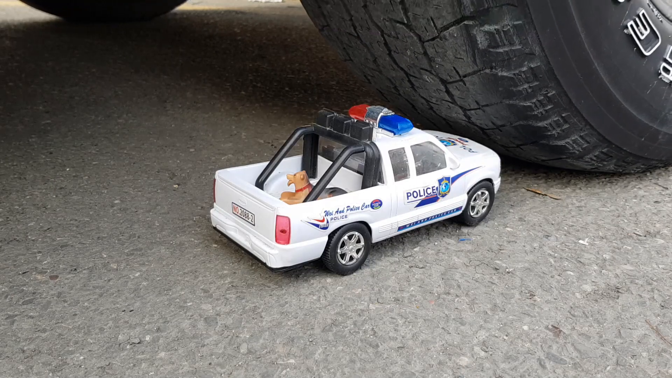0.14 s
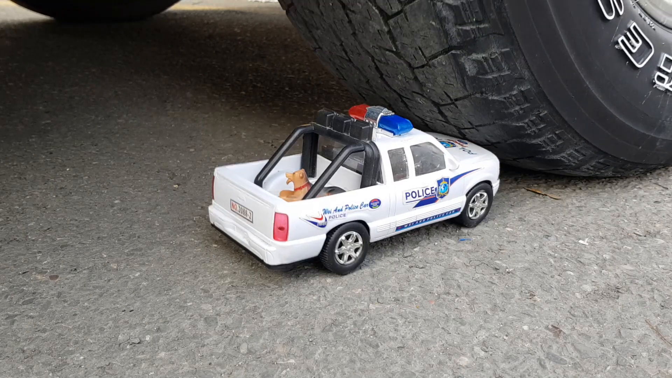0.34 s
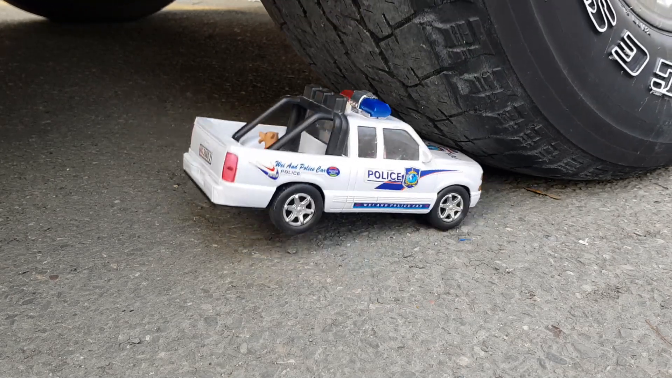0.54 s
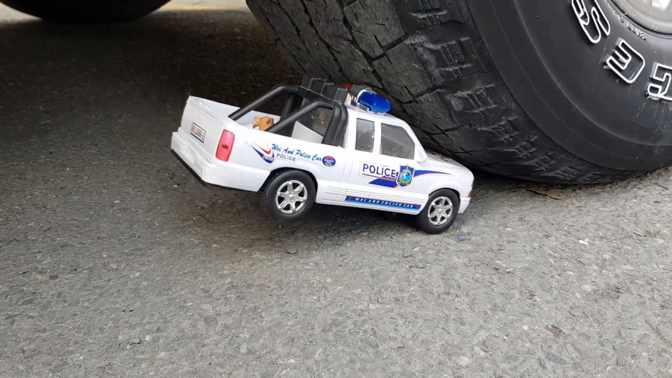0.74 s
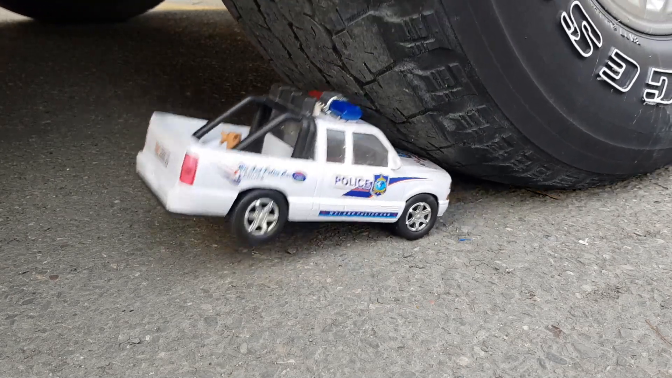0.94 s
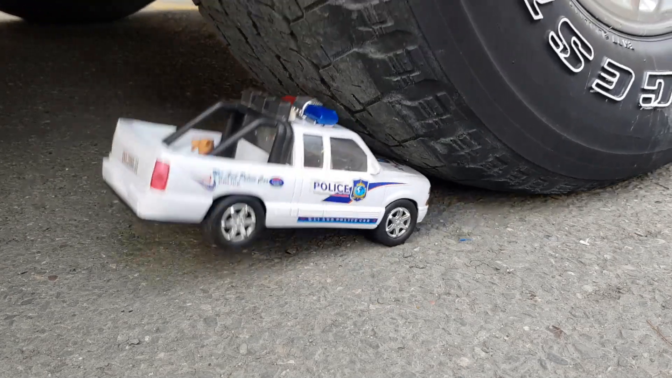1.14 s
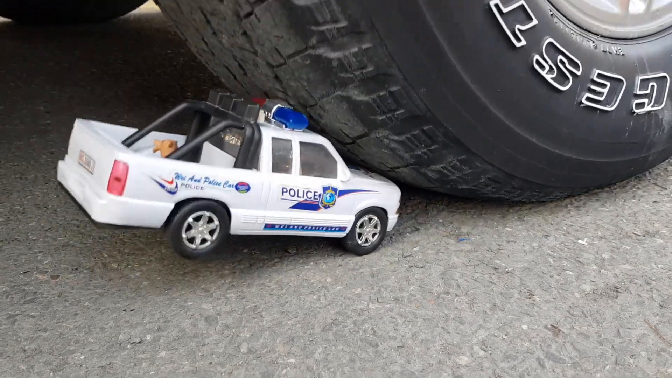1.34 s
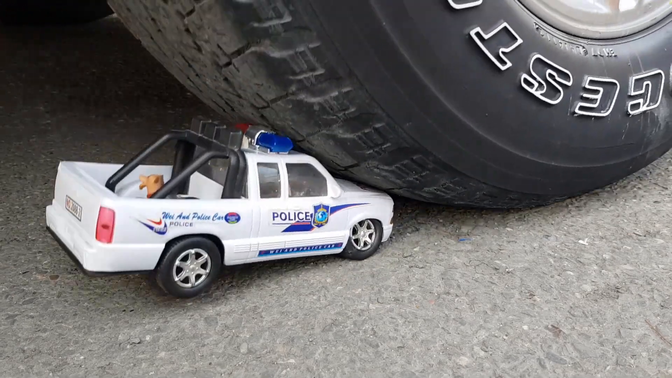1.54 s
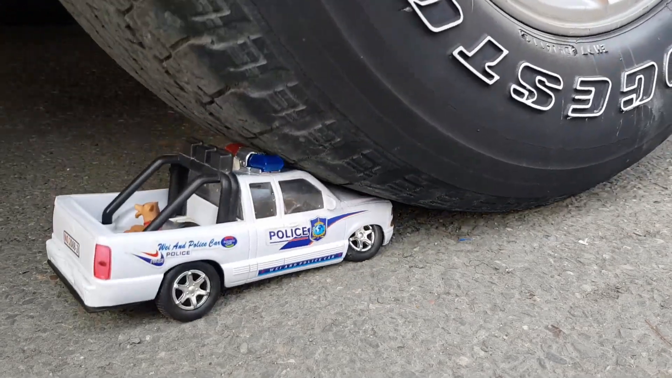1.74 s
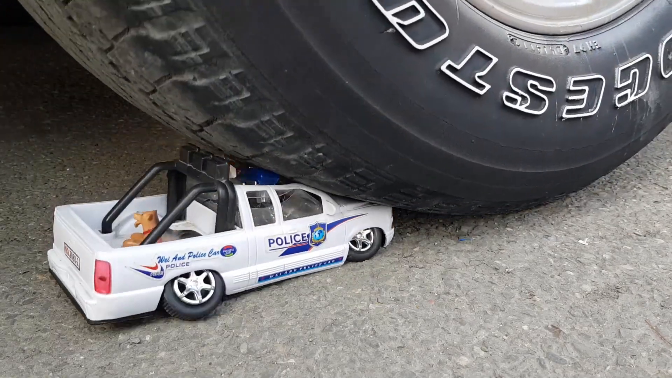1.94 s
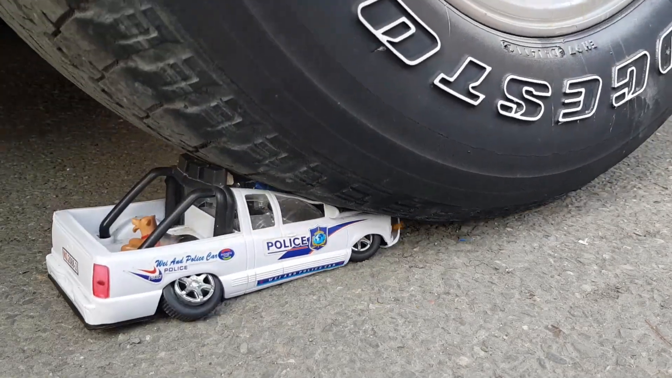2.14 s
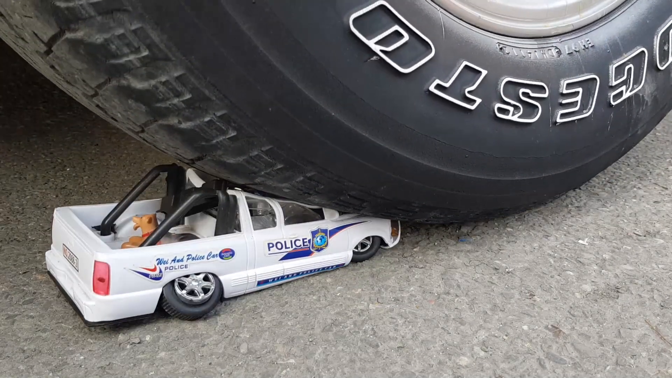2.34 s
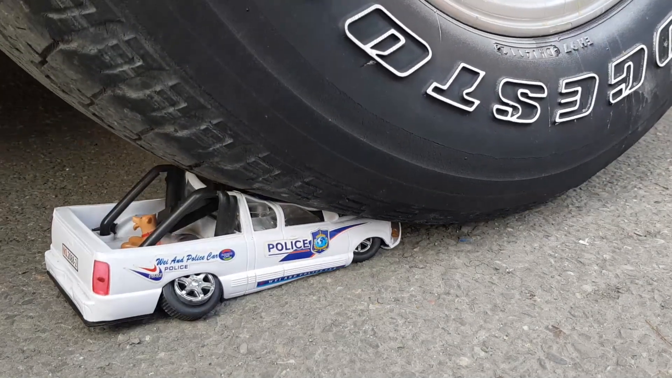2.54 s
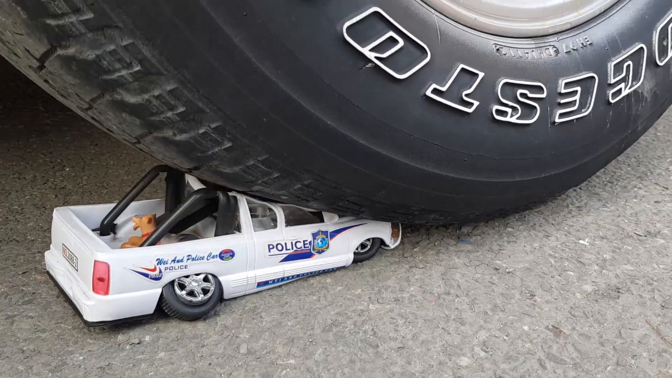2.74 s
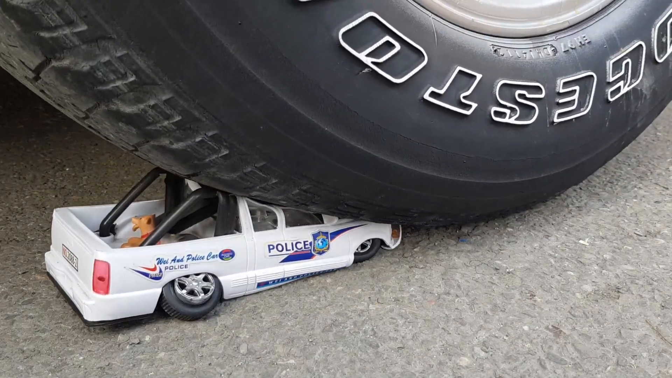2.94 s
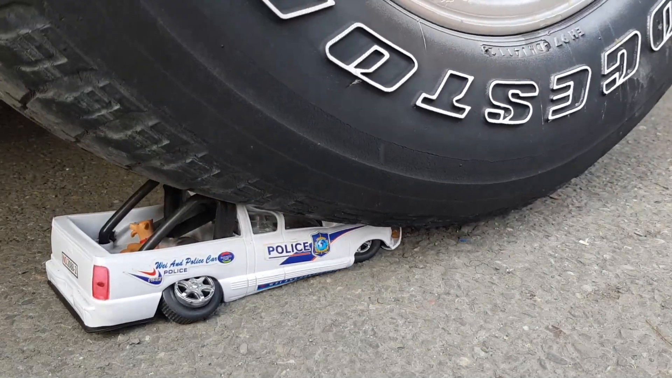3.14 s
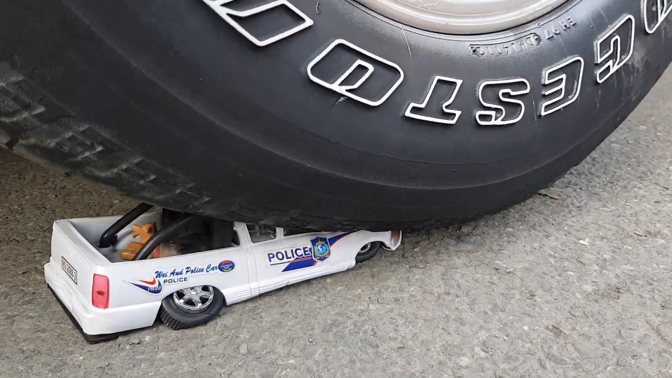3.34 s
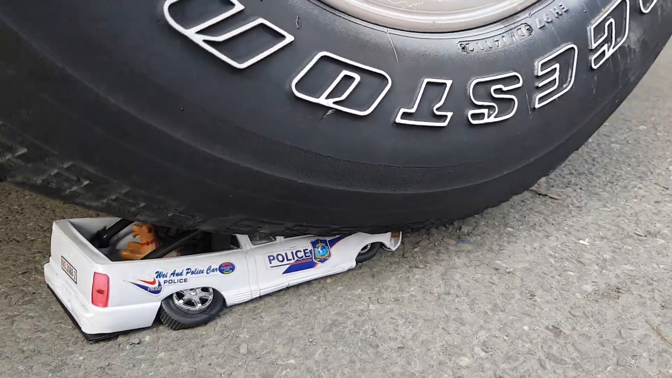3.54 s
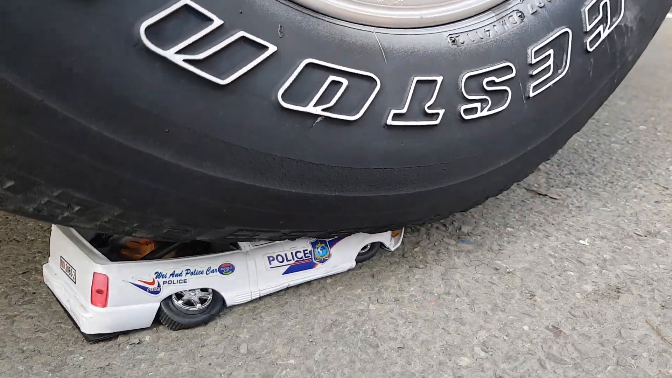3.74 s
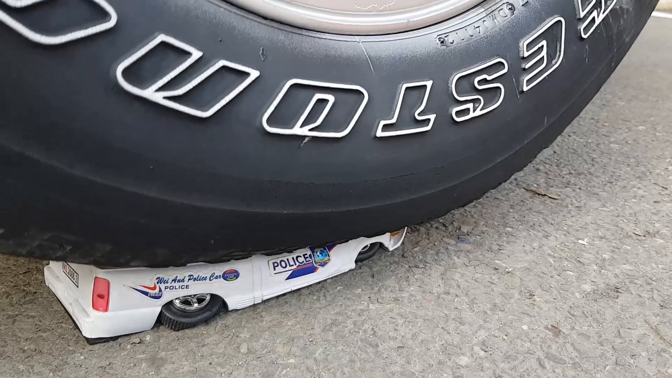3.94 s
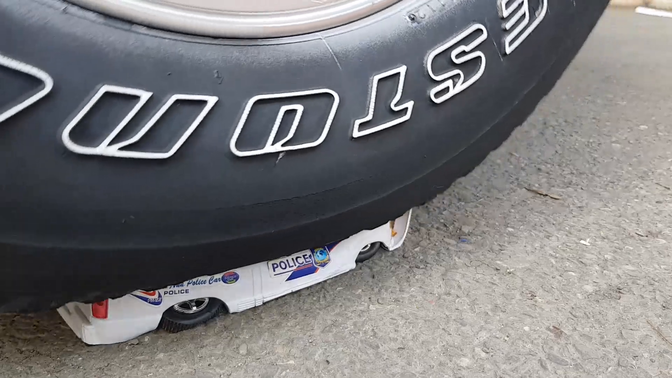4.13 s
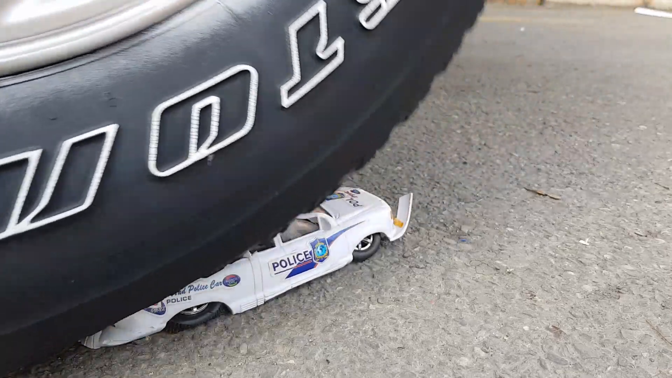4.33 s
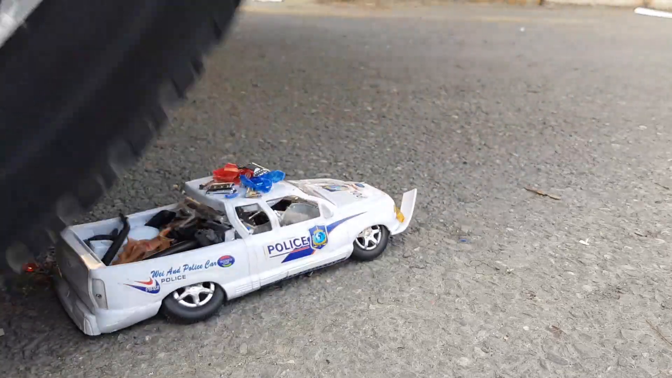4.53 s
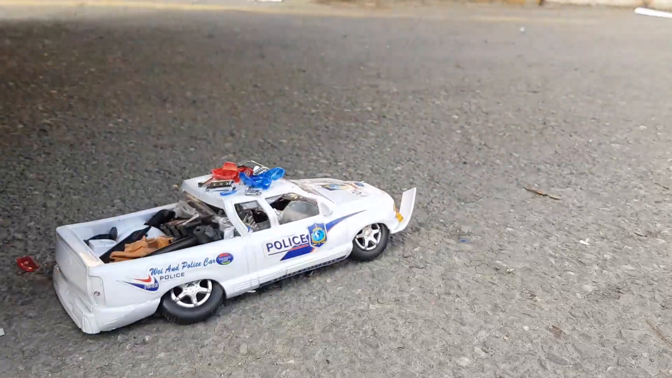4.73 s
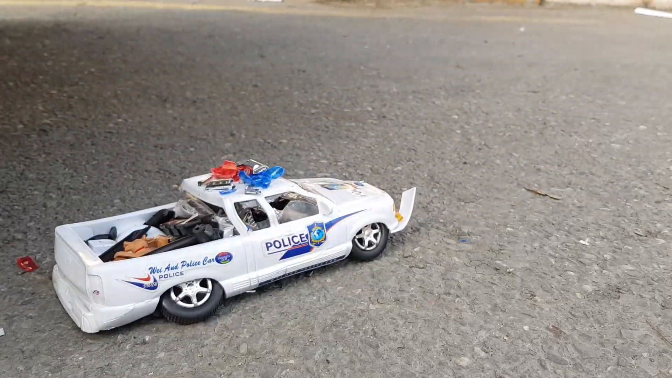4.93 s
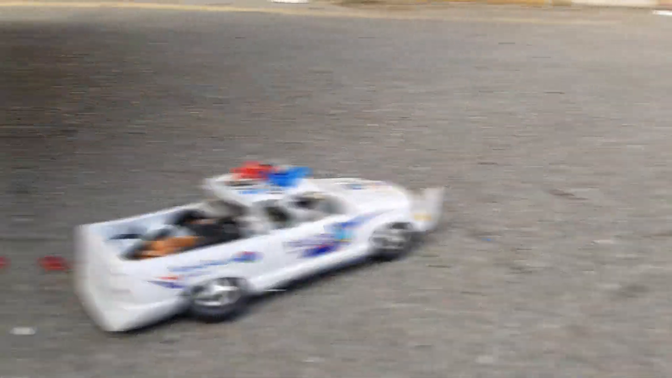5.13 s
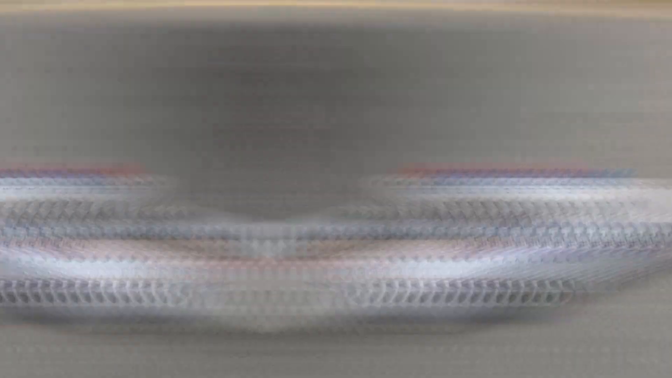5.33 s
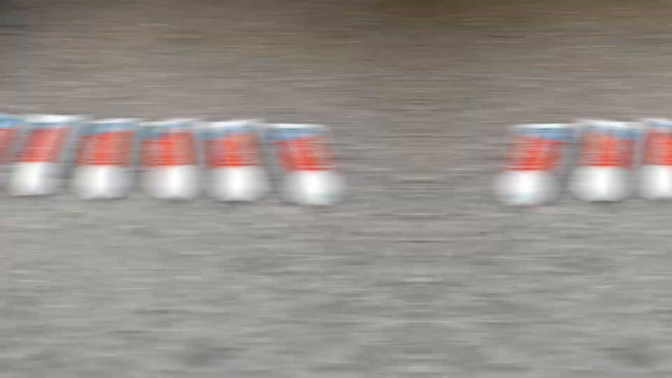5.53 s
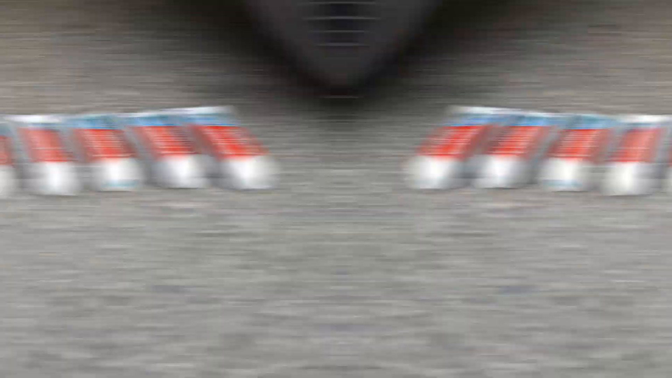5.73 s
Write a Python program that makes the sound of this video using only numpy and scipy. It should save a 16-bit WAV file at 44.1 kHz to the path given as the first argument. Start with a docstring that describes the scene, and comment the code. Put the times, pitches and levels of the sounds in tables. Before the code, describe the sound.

A car engine rumbles low and close on the left, heard from ground level on asphalt. From about 0.4 seconds its tyre shoves a hollow plastic toy truck, which skids and judders over grit in short scrapes. At 1.4 seconds the shell starts cracking in sharp, hollow snaps, densest around 2 seconds, with a brief crunch and dull thumps as it gives way. The engine sinks to a quieter rumble underneath. After a lull with a few stray clicks, brighter volleys of cracks and splintering run from about 3 to 4.4 seconds, with more low thuds near 4 seconds and a little grinding. From 4.7 to 5.2 seconds a small loose part bounces away with faint, very high tinkles. After 5 seconds the engine sound moves to the centre, and its drone, hiss and belt whirr swell until the end, near 5.8 seconds.

```python
"""On asphalt, microphone close by at ground level: a car creeps up on the left, engine rumbling throughout.
Its tread shoves a hollow plastic toy truck, which skids and judders on grit. From 1.4 s the shell
cracks in volleys that ring its body and panels, and it collapses with dull thumps under the tyre.
Near 4.7 s a small loose part tinkles away. Last, the microphone swings to face the engine bay,
and its hiss and whirr swell."""
import sys
import numpy as np
from scipy import signal
from scipy.io import wavfile

SR = 44100
rng = np.random.default_rng(int(sys.argv[2]) if len(sys.argv) > 2 else 0)


def dump(signal):
    """Clip the signal to [-1, 1] and save it as 16-bit WAV at the path in sys.argv[1]."""
    limited = np.clip(np.atleast_2d(signal).T, -1, 1)
    pcm = np.round(limited * 32767).astype(np.int16)
    wavfile.write(sys.argv[1], SR, pcm)


N = 254752
TIME = np.arange(N) / SR

# The shell cracking, close on the left. Each row: start in seconds, level in dB,
# brightness (treble over shell) in dB, tearing time in seconds.
CRACKS = [(1.4284, -10, -9, 0.001), (1.4358, -19.5, -17, 0.003), (1.4553, -14.5, 2.5, 0.0018),
          (1.4657, -14.5, -2.5, 0.00053), (1.5274, -12, -5, 0.0042), (1.5729, -14.0, -9, 0.0013),
          (1.6499, -13, -9, 0.0017), (1.6941, -13.5, -1, 0.0023), (1.7101, -11, -21.5, 0.0019),
          (1.719, -16, -29, 0.0063), (1.7412, -17, -5.5, 0.0012), (1.7872, -12.0, -0.5, 0.0023),
          (1.864, -24.5, 8, 0.001), (1.8721, -15, 0, 0.0024), (1.9144, -18, 8.5, 0.0011),
          (1.9212, -12.5, 5.5, 0.004), (1.9633, -15.5, 1, 0.0033), (1.972, -26, 4.5, 0.0042),
          (1.9974, -17, -1, 0.0014), (2.008, -22, 7.5, 0.0016), (2.0228, -19, 4.5, 0.0011),
          (2.0283, -12, 3.5, 0.0029), (2.0388, -21.5, 0, 0.0023), (2.05, -17, 10, 0.0014),
          (2.0751, -25, 7.5, 0.0011), (2.086, -14, -1, 0.0024), (2.0939, -12.5, 2, 0.0025),
          (2.1088, -15.5, 7.5, 0.0037), (2.1783, -13.5, -0.5, 0.0033), (2.2127, -19.5, 15, 0.001),
          (2.234, -14.5, 4.5, 0.0045), (2.2626, -20.5, -3, 0.0011), (2.309, -30.5, -5, 0.002),
          (2.3503, -29, 4, 0.00081), (2.3868, -28, 26, 0.00047), (2.4673, -17.5, 0, 0.00083),
          (2.7562, -24, 26, 0.0011), (2.9573, -15, 10.5, 0.0013), (3.016, -27, 18, 0.001),
          (3.0221, -26, 2.5, 0.001), (3.103, -32, 14.5, 0.0019), (3.1212, -23, 12, 0.0018),
          (3.1402, -15.5, 10, 0.0021), (3.1656, -25.5, 1, 0.0021), (3.2202, -36, 18.5, 0.001),
          (3.2392, -27.5, 9.5, 0.0015), (3.2539, -15, 3, 0.0031), (3.2608, -11, 10, 0.0023),
          (3.2856, -23, 14.5, 0.00096), (3.3021, -15, 14.5, 0.0013), (3.3574, -15.5, 12.5, 0.0012),
          (3.372, -14.5, 11, 0.00098), (3.377, -14.5, -7.5, 0.0017), (3.3846, -15.0, 0, 0.0025),
          (3.4254, -19, -1, 0.001), (3.4588, -25.5, 8, 0.0022), (3.5074, -22.5, 18, 0.0016),
          (3.5266, -16.5, 17.5, 0.0015), (3.554, -21.5, 10.5, 0.00091), (3.6022, -18.5, 20, 0.0031),
          (3.618, -23, 24, 0.0015), (3.6416, -20, 34, 0.00029), (3.648, -15, 2.5, 0.0017),
          (3.752, -39, 6, 0.0011), (3.7966, -16, 2, 0.0013), (3.8089, -23, 14, 0.00047),
          (3.8496, -38, 27, 0.00059), (3.8886, -21, 13, 0.0024), (3.896, -16.5, 8, 0.0016),
          (3.9044, -12.0, -1, 0.0024), (3.9177, -18, -3, 0.0053), (4.0365, -29.5, 3.5, 0.0012),
          (4.067, -23.5, 10.5, 0.0002), (4.1267, -16, -2.5, 0.0013), (4.1588, -20.5, 5, 0.00082),
          (4.175, -15.5, 2, 0.0047), (4.2009, -14, -4.5, 0.0016), (4.221, -15.5, 5.5, 0.0013),
          (4.2366, -15, -6, 0.0014), (4.2914, -17, 17, 0.00071), (4.3233, -18.5, 9.5, 0.00047),
          (4.3334, -14, -7.5, 0.0018), (4.3576, -24, 2, 0.00028), (4.412, -30.5, 9, 0.0018),
          (4.4477, -30.5, 19, 0.0025), (4.581, -42.5, 10, 0.001), (4.793, -39.5, 17, 0.002)]
# What the toy rings with, largest part first. Each row: pitch in Hz, width in Hz, level in dB.
BODY_MODES = [(372, 94, -4), (425, 41, -3.5), (629, 117, 6.5)]
PANEL_MODES = [(883, 99, 0.5), (1001, 146, -1), (1176, 290, 0), (1496, 256, -1), (1780, 210, 0),
               (2150, 920, -9.5)]
SNAP_MODES = [(2370, 660, -3), (2920, 730, -3), (3700, 630, -1), (4750, 410, 0.5), (5350, 620, -0.5),
              (7640, 1400, -4.5)]
SPLINTER_MODES = [(9860, 2600, -5), (11600, 680, 2.5), (12470, 1400, 1), (14100, 5100, -6)]
# The climbing tyre smothers the panels. Each row: time in seconds, panels over body in dB.
PANELS_FREE = [(1.45, 6.5), (1.85, 17.5), (2.09, 1), (2.26, 10.5), (3.3, -2), (4.15, 0.5), (4.25, -16)]
def cracks(break_up_s=0.021, splinter_pan_db=0.35):
    """Each crack shares its power among hollow body, panels, snapping edge and flying splinters."""
    out = np.zeros((2, N))
    for s, level_db, bright_db, tear_s in CRACKS:
        tear_s = np.clip(tear_s, .0003, .006)
        # A brighter crack favours the smaller parts; the intact shell sheds fewer splinters.
        shell, treble = share(from_db(level_db), bright_db)
        body, panels = share(shell, np.interp(s, *np.transpose(PANELS_FREE)) + 0.21 * bright_db)
        intact = np.exp(-(s - CRACKS[0][0]) / break_up_s)
        snap, splinters = share(treble, -0.5 - 8 * intact + 0.27 * bright_db)
        splinters = splinters * from_db([[splinter_pan_db], [-splinter_pan_db]])
        knock = fracture(tear_s * 0.5, BODY_MODES, 170, 915, detune=0.05, jagged_db=3.5)
        clack = fracture(tear_s * 0.75, PANEL_MODES, 620, 2870, detune=0.043, jagged_db=2)
        click = fracture(tear_s, SNAP_MODES, 1800, 7000, detune=0.054, jagged_db=3)
        spray = fracture(tear_s, SPLINTER_MODES, 9200, 15060, detune=0.027, jagged_db=4.5)
        add(out, s, body * from_db(1.17) * knock + panels * from_db(-0.8) * clack)
        add(out, s, snap * from_db(1.12) * click + splinters * from_db(0.85) * spray)
    return out


def fracture(tear_s, modes, low_hz, high_hz, detune, jagged_db, size=1500):
    """A running crack is a short volley of uneven slips; each shard rings at slightly different pitches."""
    age = (np.arange(size) + 1) / (tear_s * SR)
    slips = rng.standard_normal((2, size)) * from_db(jagged_db * rng.standard_normal(size))
    slips = stereo(slips, np.sqrt(low_hz * high_hz)) * np.sqrt(age) * np.exp(-age)
    chance = rng.standard_normal((len(modes), 2))
    shard = [(hz * np.exp(detune * shift), width, db + 2 * strength)
             for (hz, width, db), (shift, strength) in zip(modes, chance)]
    return unit_rms(band(ring(slips, shard), low_hz, high_hz)) * np.sqrt(.005 * SR / size)


# The tread shoves the toy along the road. Each row: start in seconds, level in dB, length in seconds.
SKIDS = [(0.37, -38.5, 0.041), (0.454, -34, 0.01), (0.494, -28.5, 0.025), (0.736, -31, 0.014),
         (0.956, -20.5, 0.0093), (1.095, -25, 0.014), (1.211, -21, 0.011), (1.353, -25.5, 0.012),
         (1.399, -30.5, .008)]
def skids(judder_per_s=150, judder_db=3):
    """The toy's wheels stick and slip over grit; uneven bursts of grains ring the body and panels."""
    push = np.zeros(N)
    for s, level_db, length in SKIDS:
        age = TIME[:SR // 5] / length
        add(push, s, from_db(level_db) * np.sqrt(2 * np.e * age) * np.exp(-age))
    grit = stereo(grains(per_s=3000, spread_db=1), 1400)
    grit = push * unit_rms(grit * from_db(judder_db * drift(judder_per_s)))
    scratch = from_db(-9.5) * band(grit, 2260, 6800) + from_db(-8.5) * band(grit, 8400, 12400)
    return from_db(13) * ring(grit, BODY_MODES[2:] + PANEL_MODES) + scratch


# The tyre grinds the broken shell. Each row: start and length in seconds, level in dB, fade in dB/s.
GRINDS = [(1.92, 0.16, -35.5, 350.5), (4.17, 0.25, -46.5, 120), (4.437, 0.036, -47, 82.5)]
def crumbs(shell, rise_s=0.02):
    """Chips crackle under the tread and after cracks, duller in a grind; stray bits knock on panels."""
    grinding = 0
    for s, length, level_db, fade in GRINDS:
        onset = np.clip((TIME - s) / rise_s, 0, 1)
        grinding += onset * from_db(level_db - fade * np.maximum(0, TIME - s - length))
    crackling = engine_gain(-54.5, follows=1.2) + from_db(-11) * lingering(shell, settle_s=0.0035)
    chips = unit_rms(stereo(grains(per_s=1300, spread_db=4.5), 3300) * from_db(2 * drift(30)))
    bits = unit_rms(stereo(grains(per_s=140, spread_db=2), 1400))
    bits *= from_db(-24) * lingering(shell, settle_s=0.026)
    knocks = ring(bits, PANEL_MODES + SNAP_MODES[:3])
    rustle = band(chips * (crackling + grinding), 420, 2800)
    fizz = band(chips * (crackling + from_db(-4) * grinding) + from_db(-8) * bits, 3800, 22000)
    return from_db(6.5) * knocks + from_db(7.5) * rustle + from_db(2.5) * fizz


# The shell gives way. Each row: start in seconds, level in dB, pitch in Hz, 60 dB decay in seconds.
THUMPS = [(2.086, -16, 190, 0.016), (2.093, -11, 368, 0.038), (2.184, -12.5, 376, 0.021),
          (2.96, -22.5, 60, 0.081), (3.261, -21, 167, 0.022), (3.91, -14.5, 96, 0.094),
          (4.128, -7.5, 63.5, 0.059), (4.334, -14.5, 345, .04)]
# The carcass and two modes of the air inside. Each row: pitch in Hz, level in dB, 60 dB decay in seconds.
TYRE_MODES = [(99.8, 3, 0.58), (190, -1.5, 1.8), (368, 0, 0.64)]
# The wheel drops. Each row: start in seconds, level in dB.
WHEEL_DROPS = [(2.1, -38.5), (2.96, -47.5), (3.91, -38), (4.334, -38.5)]
def tyre():
    """The tyre thumps as the shell gives way; its carcass and air hum on when the wheel has dropped."""
    out = np.zeros(N)
    for s, level_db, hz, t60 in THUMPS:
        add(out, s, from_db(level_db) * damped_sine(hz, t60))
    hum = sum(from_db(db) * damped_sine(hz, t60) for hz, db, t60 in TYRE_MODES)
    for s, level_db in WHEEL_DROPS:
        add(out, s, from_db(level_db) * hum)
    return out


# A small hard part bounces on the asphalt nearby. Each row: start in seconds, level in dB.
BOUNCES = [(4.717, -30), (4.935, -41.5), (5.093, -42), (5.112, -48.5), (5.213, -48)]
def tinkles():
    """Each bounce rings a high pair of modes."""
    out = np.zeros(N)
    ping = (damped_sine(10950, .06) + damped_sine(11900, .05) / 2) * np.minimum(TIME[:SR] / .001, 1)
    for s, level_db in BOUNCES:
        add(out, s, from_db(level_db) * ping)
    return out


# Exhaust and fan, from beside the car. Each row: frequency in Hz, relative spectral density in dB.
RUMBLE_COLOUR = [(25, -22), (45, -6), (70, -1.5), (115, -4.5), (160, -9), (250, -13.5), (400, -24.5),
                 (700, -46.5)]
FAN_COLOUR = [(200, -17.5), (400, 6), (700, 0), (1100, -7.5), (2500, -6), (3300, -11), (7000, -12.5),
              (9000, -30), (12000, -9.5), (16000, -26)]
def engine(facing, firing_hz=53.6, wander=0.0274, throb_db=1.5):
    """An uneven firing tone over exhaust rumble, with the fan's hiss and whine from under the car's side."""
    phase = 2 * np.pi * np.cumsum(firing_hz * (1 + wander * drift(9))) / SR
    firing = unit_rms((np.sin(phase) + from_db(-7) * np.sin(2 * phase)) * from_db(throb_db * drift(18)))
    fan = coloured_noise(FAN_COLOUR, flicker_db=2.4) + from_db(-11) * whine(2453, 120)
    rumble = coloured_noise(RUMBLE_COLOUR, flicker_db=2.5)
    return (engine_gain(-32.5, follows=1.15) * firing
            + engine_gain(-33, follows=0.89) * rumble
            + engine_gain(-40.5, follows=1.096) * (1 - facing) * fan)


# The engine's level as heard: loud at first, sinking while the toy cracks, swelling again at the end.
# Each row: time in seconds, level in dB.
ENGINE_LEVEL = [(0, -34.5), (.5, -33.5), (1.4, -33), (1.75, -43.5), (2.2, -45.5), (2.6, -50), (3.7, -45.5),
                (4.3, -38.5), (4.7, -51), (5.05, -53.5), (5.78, -41)]
def engine_gain(peak_db, follows, loudest_db=-33):
    """A part's gain: peak_db when the engine is loudest, falling `follows` dB for each dB it sinks."""
    return from_db(peak_db + follows * (np.interp(TIME, *np.transpose(ENGINE_LEVEL)) - loudest_db))


# Belts and pulleys. Each row: pitch in Hz, width in Hz, level in dB.
BELT_WHISTLES = [(916, 21, -63), (4124, 71, -71.5), (6360, 88, -71.5), (8030, 860, -60)]
# The bay, heard head-on. Each row: frequency in Hz, relative spectral density in dB.
BAY_COLOUR = [(35, 4), (80, 24.5), (220, -19), (450, 0.5), (900, -3.5), (1500, -7.5), (3000, -12.5),
              (7000, -18.5), (13000, -26), (16000, -36.5)]
def engine_bay():
    """Belts and pulleys whistle over the bay's drone and hiss."""
    whirr = sum(from_db(db) * whine(hz, width) for hz, width, db in BELT_WHISTLES)
    return whirr + engine_gain(-33, follows=0.66) * coloured_noise(BAY_COLOUR, flicker_db=0.9)


def underbody(x, t60=0.11, low_hz=456, wet_db=-12, patterns=12):
    """Dense reflections between road, wheel and floor pan; their pattern changes as the wheel rolls on."""
    t, out = TIME[:SR // 4], 0
    decay = from_db(-60 * t / t60) * np.clip(t / 0.00067 - 1, 0, 1)
    for k in range(patterns):
        echoes = rng.standard_normal((2, len(t))) * decay
        echoes = band(echoes, low_hz, 11000, order=1) + from_db(-0.5) * band(echoes, 520, 3900, order=1)
        crossfade = np.sqrt(np.maximum(0, 1 - np.abs(np.linspace(0, patterns - 1, N) - k)))
        out += signal.oaconvolve(x * crossfade, unit_rms(echoes) / np.sqrt(len(t)), axes=1)[:, :N]
    return from_db(wet_db) * out


# How alike the microphone's two sides are. Each row: frequency in Hz, correlation from 0 to 1.
LIKENESS = [(60, 1), (250, .9), (520, 0.91), (1300, 0.62), (2500, 0.41), (6000, .2), (15000, .1)]
def stereo(two, hz):
    """Two unrelated signals become left and right, more alike in the bass."""
    alike = np.clip(at_hz(LIKENESS, hz), 0, 1)
    return np.sqrt(1 + alike) * two[0] + np.sqrt(1 - alike) * two[1] * np.array([[1], [-1]])


def from_left(x, pan_db, lag_samples):
    """The microphone's left side hears the sound louder and sooner."""
    left, right = x * np.ones((2, 1))
    return np.array([left, np.pad(right, (lag_samples, 0))[:N]]) * unit_rms(from_db([[pan_db], [0]]))


def coloured_noise(colour, flicker_db):
    """Stereo noise in narrow bands, each flickering on its own."""
    out, edges = 0, np.geomspace(22, 17000, 25)
    white = rng.standard_normal((2, 2, N))
    for k, (low, high) in enumerate(zip(edges, edges[1:])):
        hz = np.sqrt(low * high)
        gain = from_db(at_hz(colour, hz) + flicker_db * drift(20))
        out += gain * stereo(band(white[k % 2], low, high), hz)
    return unit_rms(out)


def whine(hz, width_hz):
    """A narrow, wavering whistle of unit power."""
    return unit_rms(resonate(resonate(rng.standard_normal((2, N)), hz, width_hz), hz, width_hz))


def grains(per_s, spread_db):
    """Random clicks of uneven size."""
    born = rng.random(N) < per_s / SR
    return born * rng.standard_normal((2, N)) * from_db(spread_db * np.minimum(rng.exponential(1, N), 4))


def damped_sine(hz, t60):
    """A struck mode that falls 60 dB in t60 seconds."""
    t = TIME[:SR]
    return np.sin(2 * np.pi * hz * t) * from_db(-60 * t / t60)


def ring(x, modes):
    """Drive a set of modes of alternating polarity."""
    return sum(resonate(x, hz, width) * from_db(db) * (-1) ** k for k, (hz, width, db) in enumerate(modes))


def resonate(x, hz, width_hz):
    """One resonance with gain 1 at its peak."""
    r = np.exp(-np.pi * width_hz / SR)
    feedback = [1, -2 * r * np.cos(2 * np.pi * hz / SR), r * r]
    return signal.lfilter(np.array([1, 0, -1]) * (1 - r * r) / 2, feedback, x + 1e-18)


def band(x, low_hz, high_hz, order=2):
    """Causal band-pass."""
    sos = signal.butter(order, [low_hz, min(high_hz, .45 * SR)], "band", fs=SR, output="sos")
    return signal.sosfilt(sos, x + 1e-18)


def share(gain, upper_over_lower_db):
    """Divide a sound's power between a lower and an upper part."""
    ratio = from_db(upper_over_lower_db)
    return gain * np.array([1, ratio]) / np.hypot(1, ratio)


def lingering(x, settle_s):
    """The strength of a sound, dying away after it."""
    r = np.exp(-1 / (settle_s * SR))
    return np.sqrt(signal.lfilter([1 - r], [1, -r], np.mean(x ** 2, axis=0) + 1e-18))


def drift(per_s):
    """A random wander of unit power."""
    knots = rng.standard_normal(int(per_s * N / SR) + 2)
    return unit_rms(np.interp(TIME * per_s, np.arange(len(knots)), knots))


def at_hz(points, hz):
    """Read a spectrum on a log-frequency axis."""
    freqs, values = np.transpose(points)
    return np.interp(np.log(hz), np.log(freqs), values)


def add(out, s, sound):
    """Mix a sound in at s seconds."""
    start = int(s * SR)
    out[..., start:start + sound.shape[-1]] += sound[..., :N - start]


def from_db(db):
    """Decibels to gain."""
    return 10 ** (np.asarray(db) / 20)


def unit_rms(x):
    """Scale to unit power."""
    return x / np.sqrt(np.mean(x ** 2) + 1e-20)


def scene():
    """The toy lies close on the left; so does the car, until the microphone swings to its engine bay."""
    shell = cracks()
    toy = shell + skids() + crumbs(shell)
    near = from_left(toy + underbody(toy) + tyre() + tinkles(), pan_db=5.5, lag_samples=6)
    facing = np.interp(TIME, [5.05, 5.45], [0, 1])
    car = engine(facing)
    side_on = from_left(car, pan_db=7, lag_samples=3)
    head_on = car + engine_bay()
    return near + (1 - facing) * side_on + facing * head_on


def record(dry, low_cut_hz=19, cutoff_hz=16000):
    """The microphone sheds the deepest bass; the sharpest peaks are rounded off and the top is cut."""
    dry = signal.sosfilt(signal.butter(1, low_cut_hz, "high", fs=SR, output="sos"), dry)
    rounded = dry / (1 + dry ** 4) ** (1 / 4)
    return signal.sosfilt(signal.ellip(10, .2, 70, cutoff_hz, fs=SR, output="sos"), rounded)


dry = scene()
out = record(dry)
dump(out)
```